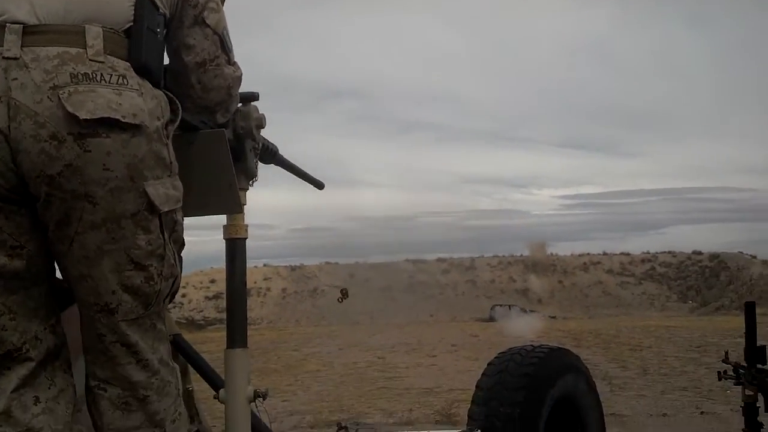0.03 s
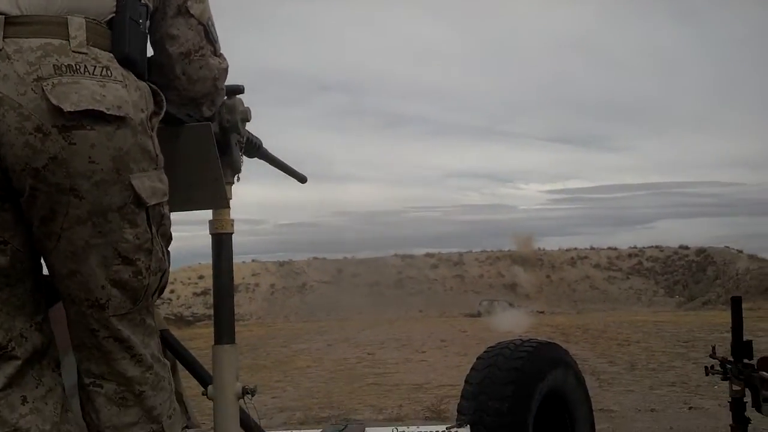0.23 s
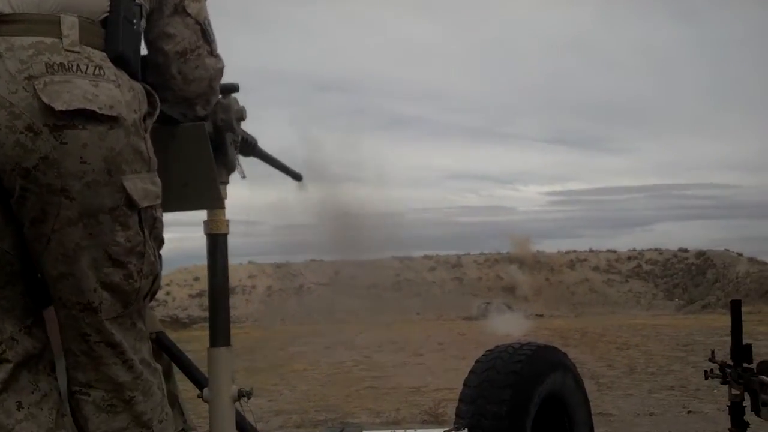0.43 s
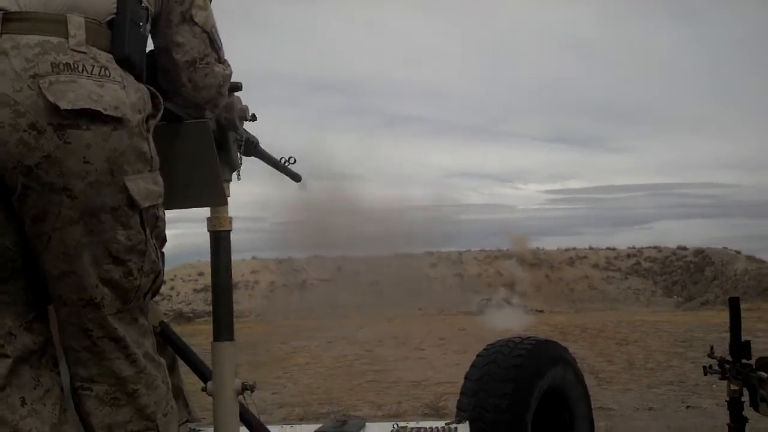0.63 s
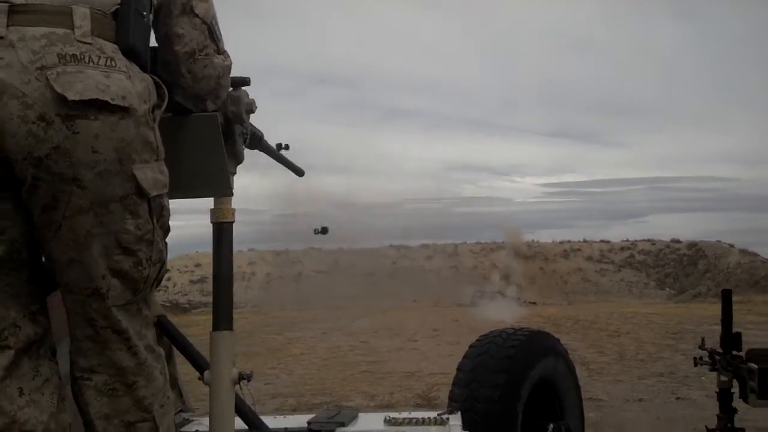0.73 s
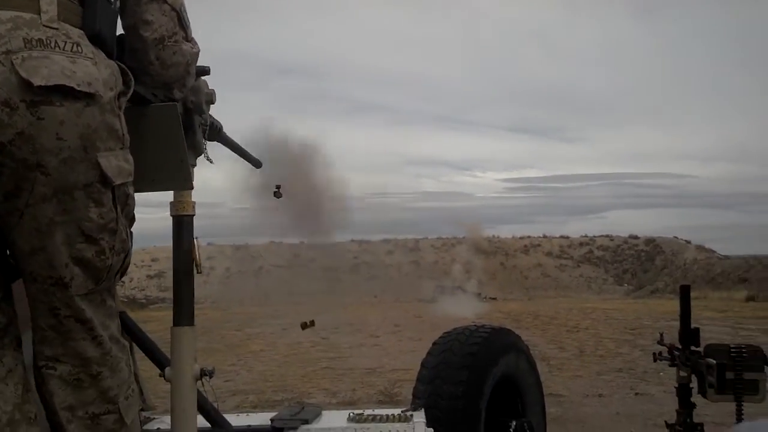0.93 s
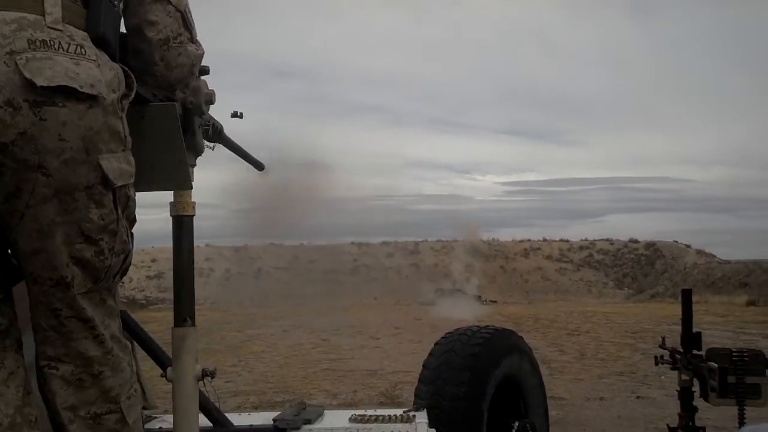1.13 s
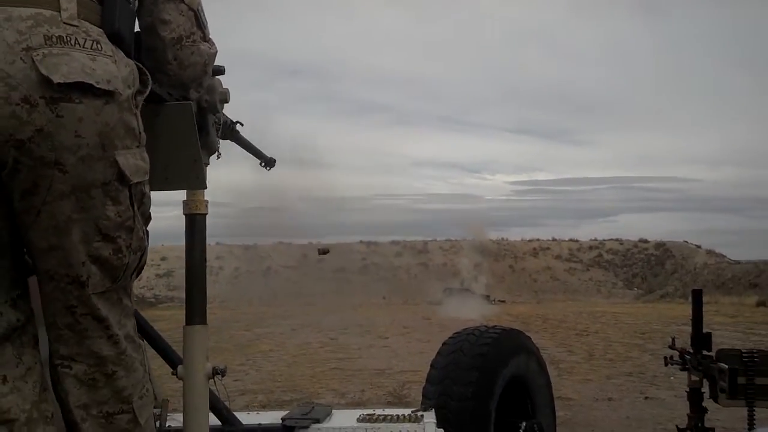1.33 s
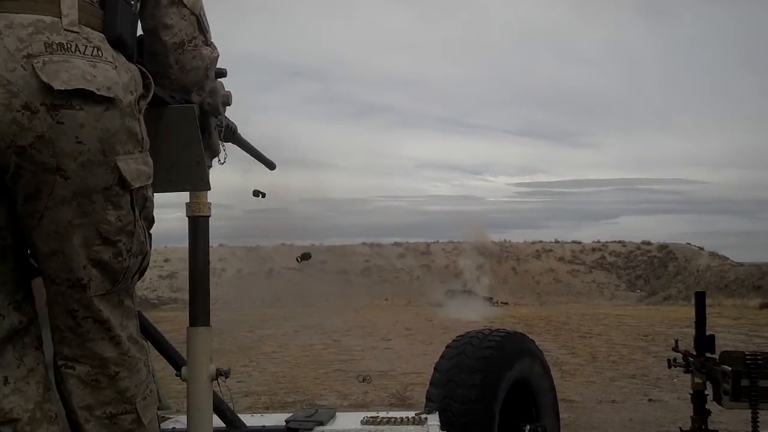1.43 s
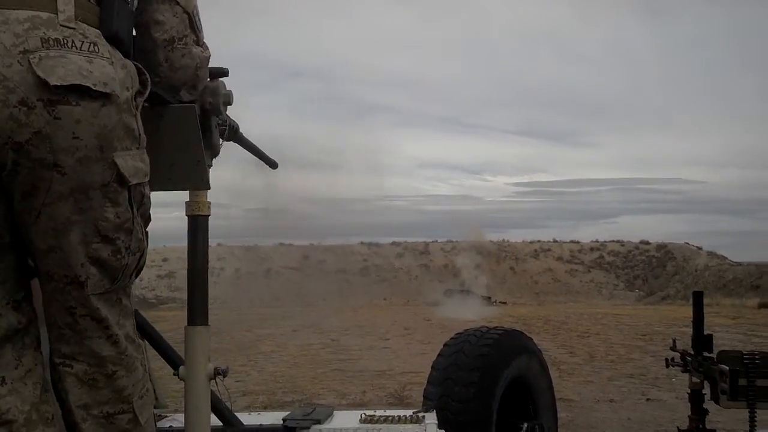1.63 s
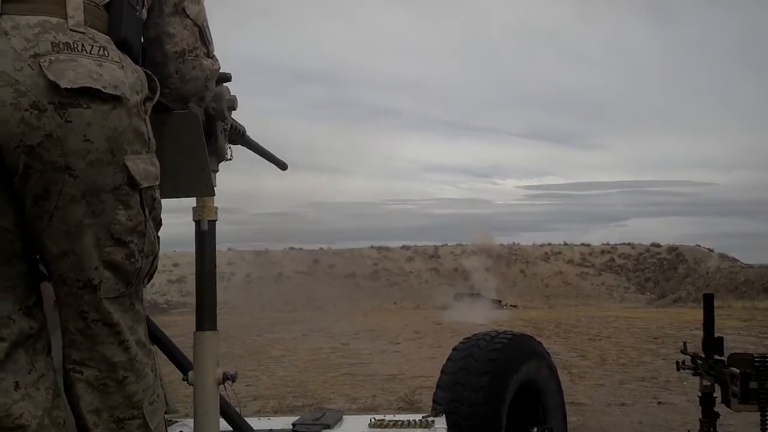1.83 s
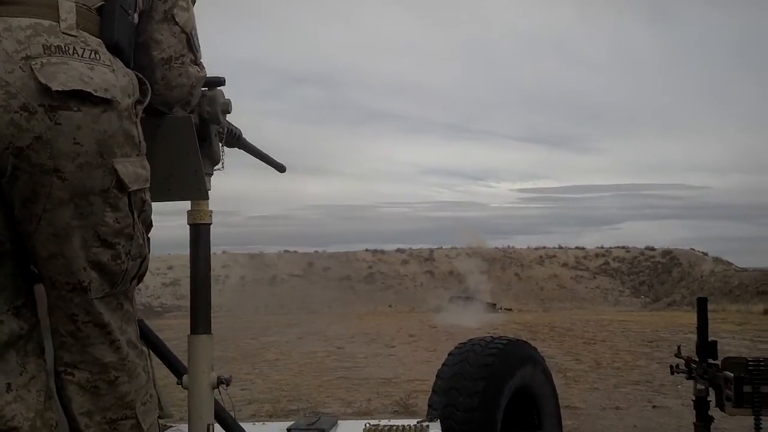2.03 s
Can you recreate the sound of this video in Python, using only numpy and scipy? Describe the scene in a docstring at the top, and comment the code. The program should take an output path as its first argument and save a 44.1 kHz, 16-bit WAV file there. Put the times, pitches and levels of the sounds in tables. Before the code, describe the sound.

Loud heavy machine gun bursts up close outdoors, with metal links clinking and echoes rolling away

```python
"""Open range, light wind, close to a vehicle: its mounted heavy machine gun fires three rounds, two, then one.
Each report is coloured noise that cracks and swells into a boom, with notes that ring the vehicle inside it.
Slow noise swells roll away over the ground, the first from a shot before the start.
Cases and gun parts knock, and wind or the rocking vehicle thumps low twice, as short noise with a note.
Belt links clink as resonant noise; a close camera with two microphone ports hears it in widened stereo."""
import sys
import numpy as np
from scipy.fft import rfft, irfft, next_fast_len
from scipy.io import wavfile
from scipy.ndimage import map_coordinates

SR = 44100
rng = np.random.default_rng(int(sys.argv[2]) if len(sys.argv) > 2 else 0)


def dump_mix(stems):
    """Bounce the given channels to the path in sys.argv[1] as a 16-bit WAV at rate SR."""
    frames = np.atleast_2d(stems).T  # one column per channel
    limited = np.clip(frames, -1, 1)  # hard clip at full scale
    pcm = np.round(limited * 32767).astype(np.int16)
    wavfile.write(sys.argv[1], SR, pcm)


N = 92610  # samples, 2.1 s


def amp(db):
    """Decibels to gain."""
    return 10 ** (np.asarray(db) / 20)


def rms(x):
    """Root mean square over everything in x."""
    return np.sqrt(np.mean(x ** 2) + 1e-20)


def unit(x):
    """Scaled to rms 1."""
    return x / rms(x)


def along(points, hz):
    """Values read between (Hz, value) points on a log frequency axis."""
    point_hz, values = np.transpose(points)
    return np.interp(np.log(hz + 1), np.log(point_hz + 1), values)


def colour(points):
    """Gain against frequency from (Hz, dB) points."""
    return lambda hz: amp(along(points, hz))


def resonances(modes):
    """Gain against frequency of peaks given as (Hz, width in Hz, dB), their powers added."""
    def response(hz):
        power = 0
        for centre, width, db in modes:
            power = power + amp(db) ** 2 / (1 + ((hz - centre) / width) ** 2) ** 2
        return np.sqrt(power)
    return response


def filtered(x, response):
    """x with its spectrum multiplied by a response of frequency."""
    size = next_fast_len(x.shape[-1] + 4096)
    spectrum = rfft(x, size) * response(np.fft.rfftfreq(size, 1 / SR))
    return irfft(spectrum, size)[..., :x.shape[-1]]


# Likeness of the two microphone ports. Each row: frequency in Hz, correlation from -1 to 1.
PORT_LIKENESS = [(40, .4), (130, 0.92), (300, 0.93), (480, 0.77), (900, 0.35), (1600, -0.11),
                 (4000, -0.013), (15000, -0.062)]


def noise(response, size):
    """Coloured noise of rms 1 at the two ports; the mid and side shares set how alike they are."""
    def mid_and_side(hz):
        turn = np.arccos(np.clip(along(PORT_LIKENESS, hz), -.99, .99)) / 2
        return response(hz) * np.array([np.cos(turn), np.sin(turn)])
    mid, side = filtered(rng.standard_normal((2, size)), mid_and_side)
    return unit(np.array([mid + side, mid - side]))


def fade(t, attack, t60, hold=0):
    """Attack, with an exponential release that starts after the hold."""
    return (1 - np.exp(-(t / attack) ** 2)) * amp(-60 * np.maximum(t - hold, 0) / t60)


def swell(t, peak, sharp):
    """A rounded rise to 1 at the peak time and a slower fall."""
    return (t / peak * np.exp(1 - t / peak)) ** sharp


WAVER_RAD, WAVER_RATE = 0.52, 125  # usual depth of the unsteady phase, random points a second
PORT_RAD = 0.37  # phase shift at each port, in opposite directions


def note(t, hz, fall=0, waver=WAVER_RAD):
    """A slightly unsteady tone of rms 1 at the two ports, its pitch falling by fall Hz a second."""
    drift = map_coordinates(rng.standard_normal(512), [t * WAVER_RATE], mode="wrap")
    phase = 2 * np.pi * (hz * t - fall * t ** 2 / 2 + rng.random()) + waver * drift
    port_shift = PORT_RAD * rng.choice([-1, 1]) * np.array([[1], [-1]])
    return np.sqrt(2) * np.sin(phase + port_shift)


def add(out, s, sound):
    """Mix a sound in at s seconds, cut at both ends of the scene."""
    i = round(s * SR)
    part = sound[:, max(-i, 0):N - i]
    out[:, max(i, 0):][:, :part.shape[1]] += part


# Light wind on the range. Each row: frequency in Hz, relative level in dB.
WIND_COLOUR = [(25, -17), (70, -16), (130, 6.5), (300, 1), (700, -8), (1600, -8), (3500, -28.5),
               (6500, -15), (10000, -38.5), (15500, -20)]
WIND_DB = -41.5


def wind():
    """Light wind as a steady floor of coloured noise."""
    return amp(WIND_DB) * noise(colour(WIND_COLOUR), size=N)


# The rounds fired. Each row: start in seconds, level of the crack in dB, level of the boom in dB.
SHOTS = [(0.4315, -18, -17), (0.5443, -19, -17.5), (.6421, -19, -17), (0.9936, -18, -17.5),
         (1.1115, -19.5, -17.5), (1.5454, -17, -17.5)]
# Echo off ground and far bank. Each row: frequency in Hz, relative level in dB.
ECHO_COLOUR = [(30, -25), (70, -11), (130, 11), (450, 1.5), (900, -6.5), (1800, -10.5), (3500, -17.5),
               (7000, -40), (15000, -59)]
EARLIER_SHOT_S, EARLIER_DB = -.3, -20.5  # only its echo is left
ECHO_DB, ECHO_RISE_S, ECHO_T60_S = -4, 0.074, 0.96  # level against the boom


def echoes():
    """Each report rolls back from the ground and the far bank as a slow, fading swell of noise."""
    out, t = np.zeros((2, N)), np.arange(SR) / SR
    envelope = fade(t, ECHO_RISE_S, ECHO_T60_S, hold=ECHO_RISE_S)
    returns = [(EARLIER_SHOT_S, EARLIER_DB)]
    returns += [(s, boom_db + ECHO_DB) for s, _, boom_db in SHOTS]
    for s, db in returns:
        add(out, s, amp(db) * envelope * noise(colour(ECHO_COLOUR), size=len(t)))
    return out


# Belt links dropping. Each row: start in seconds, level in dB, 60 dB decay time in seconds,
# scrape in dB against the jingle.
CLINKS = [(.033, -38.5, 0.28, 1), (.069, -30.5, 0.11, -2.5), (0.1762, -35.5, .12, 7), (0.219, -37, 0.36, 1),
          (.251, -38.5, 0.29, -8), (0.272, -35, 0.43, -3), (.745, -37, 0.18, -11), (0.8292, -29, 0.016, 14),
          (1.205, -31, 0.39, -10), (1.249, -34, 0.33, -24), (1.322, -35, 0.31, -3), (1.480, -39, 0.27, -5),
          (1.732, -31.5, 0.45, -7), (1.85, -39.5, 0.97, -5), (1.975, -43, 0.66, -2)]
# Modes of a steel link. Each row: frequency in Hz, width in Hz, relative level in dB.
LINK_MODES = [(4930, 62, -5), (6320, 78, 4.5), (6520, 160, -3), (7144, 70, -1.5), (10020, 106, -8.5),
              (12300, 160, -7), (14000, 150, -2.5), (14840, 340, -6)]
# Link scraping on metal. Each row: frequency in Hz, relative level in dB.
SCRAPE_COLOUR = [(1000, -30), (3000, 9), (6500, 0.5), (9000, 2), (15500, 2.5)]
# One singing case: start in seconds, pitch in Hz, level in dB, 60 dB decay time in seconds.
SINGING_CASE = (1.1, 7144.5, -47.5, 2.2)
CLINK_ATTACK_S, SINGING_RISE_S = 0.00081, 0.016


def links():
    """Steel links scrape and jingle in their modes as they drop; one case sings for half a second."""
    out, t = np.zeros((2, N)), np.arange(SR // 2) / SR
    for s, db, t60, scrape_db in CLINKS:
        jingle = noise(resonances(LINK_MODES), size=len(t))
        scrape = amp(scrape_db) * noise(colour(SCRAPE_COLOUR), size=len(t))
        add(out, s, amp(db) * fade(t, CLINK_ATTACK_S, t60) * unit(jingle + scrape))
    s, hz, db, t60 = SINGING_CASE
    add(out, s, amp(db) * fade(t, SINGING_RISE_S, t60) * note(t, hz))
    return out


# Cases and gun parts knocking, and two soft low thumps of wind or the rocking vehicle (at 0.121
# and 2.018 s). Each row: start in seconds, level in dB, 60 dB decay time in seconds,
# pitch in Hz, note in dB against that level, treble tilt of the noise in dB.
KNOCKS_AND_THUMPS = [(.036, -25.5, 0.14, 592, 3.5, -10.5), (0.121, -50.5, 0.13, 120, 23, -14),
                     (.203, -23.5, 0.16, 443, -0.5, -6.5), (.251, -28.5, 0.1, 1435, -5, -3),
                     (0.263, -28, 0.19, 1183, -9.5, -14), (0.376, -26, 0.12, 1272, -8, 0.5),
                     (.829, -14.5, 0.064, 487, -6, -4), (.900, -25.5, .09, 591, 0.5, -3),
                     (.927, -16.5, 0.13, 548, -3, -13.5), (.951, -18, .12, 596, -0.5, -10),
                     (1.208, -19.5, 0.079, 476, -6, -1), (1.278, -12.5, 0.045, 450, -2.5, -13),
                     (1.396, -14.5, 0.031, 194, 7, -15), (1.479, -31, .15, 3530, -14, 2.5),
                     (1.829, -16.5, 0.031, 640, -3.5, -13), (1.858, -26.5, 0.042, 970, -6, -3),
                     (1.873, -22.5, 0.14, 1333, -12.5, -4), (1.915, -29.5, 0.079, 1806, -1, 0.5),
                     (1.962, -32, 0.19, 1264, -7.5, -3), (2.008, -31.5, 0.17, 2016, -13, -4.5),
                     (2.018, -48, .14, 109, 19.5, -10), (2.068, -34, 0.15, 616, -3.5, -6.5)]
# Short noise before its tilt. Each row: frequency in Hz, relative level in dB.
KNOCK_COLOUR = [(40, -25), (120, -4), (300, -0.5), (600, -5), (1400, -6), (2200, -5), (4000, -14.5),
                (7000, -15.5), (10000, -29), (15500, -28)]
KNOCK_ATTACK_S, KNOCK_WAVER_RAD = 0.00049, 0.85
TREBLE_FROM_HZ, TREBLE_FULL_HZ = 1210, 4030  # the tilt begins, and is complete


def knocks_and_thumps():
    """Short noise and a note: cases and gun parts knock; wind or the rocking vehicle thumps, mostly note."""
    out, t = np.zeros((2, N)), np.arange(SR // 4) / SR
    for s, db, t60, pitch, note_db, treble_db in KNOCKS_AND_THUMPS:
        tilt = [(TREBLE_FROM_HZ, 0), (TREBLE_FULL_HZ, treble_db)]
        tilted = lambda hz: amp(along(KNOCK_COLOUR, hz) + along(tilt, hz))
        envelope = fade(t, KNOCK_ATTACK_S, t60)
        short_noise = rms(envelope) * unit(envelope * noise(tilted, size=len(t)))
        fading_note = amp(note_db) * envelope * note(t, pitch, waver=KNOCK_WAVER_RAD)
        add(out, s, amp(db) * (short_noise + fading_note))
    return out


GRAIN_DB, GRAIN_RATE = 2, 900  # depth, lumps a second


def crackle(t):
    """A fast, lumpy random gain inside the blast."""
    return amp(GRAIN_DB * map_coordinates(rng.standard_normal(2048), [t * GRAIN_RATE], mode="wrap"))


# Colours of snap and crack, bark, boom and air push. Each row: frequency in Hz, relative level in dB.
CRACK_COLOUR = [(60, -18), (200, 9.5), (700, -0.5), (2000, 0.5), (4000, -1), (6500, -3), (9000, -8.5),
                (12000, -9.5), (15500, -5)]
BARK_COLOUR = [(150, -4), (500, 3), (1200, 0.5), (2000, 1.5), (3000, -4.5), (5000, -6.5), (7000, -14.5),
               (10000, -49), (15000, -30)]
BOOM_COLOUR = [(30, -22), (80, -11.5), (130, -6.5), (200, -6), (300, -3), (480, -8), (800, -7.5),
               (1200, -19), (2200, -42), (5000, -55)]
PUSH_COLOUR = [(20, -11), (45, -6), (100, 8), (170, -16), (400, -26), (1500, -70)]
SAME_SHARE = 0.77  # power share of each report that repeats from shot to shot
LEAD_S, LEAD_DB, LEAD_T60_S = .0045, -5.5, 0.059  # snap: time before the blast, level against the crack
CRACK_ATTACK_S, CRACK_HOLD_S, CRACK_T60_S = 0.00064, 0.0076, 0.46
BARK_DB, BARK_PEAK_S, BARK_SHARP = -2, 0.025, 0.67  # level against the boom
BOOM_PEAK_S, BOOM_SHARP = 0.045, 1.84
PUSH_DB, PUSH_PEAK_S, PUSH_SHARP = -11, 0.0064, 1  # level against the boom


def gun():
    """The action snaps, then crack, bark, boom and a low push of air, much alike in every shot."""
    out, t = np.zeros((2, N)), np.arange(SR // 2) / SR
    times, crack_db, boom_db = np.transpose(SHOTS)
    snap = fade(t, CRACK_ATTACK_S, LEAD_T60_S)
    crack = crackle(t) * fade(t, CRACK_ATTACK_S, CRACK_T60_S, CRACK_HOLD_S)
    bark = crackle(t) * swell(t, BARK_PEAK_S, BARK_SHARP)
    boom = swell(t, BOOM_PEAK_S, BOOM_SHARP)
    push = swell(t, PUSH_PEAK_S, PUSH_SHARP)
    layers = [(CRACK_COLOUR, snap, crack_db + LEAD_DB, LEAD_S),
              (CRACK_COLOUR, crack, crack_db, 0),
              (BARK_COLOUR, bark, boom_db + BARK_DB, 0),
              (BOOM_COLOUR, boom, boom_db, 0),
              (PUSH_COLOUR, push, boom_db + PUSH_DB, 0)]
    for points, envelope, levels, early in layers:
        same = noise(colour(points), size=len(t))
        for s, db in zip(times, levels):
            fresh = noise(colour(points), size=len(t))
            blast = envelope * (np.sqrt(SAME_SHARE) * same + np.sqrt(1 - SAME_SHARE) * fresh)
            add(out, s - early, amp(db) * rms(envelope) * unit(blast))
    return out


# Notes of mount and vehicle. Each row: pitch at the peak in Hz, relative level in dB,
# peak time in seconds, sharpness of the swell, fall in Hz per second.
PANELS = [(195.5, -7, 0.045, 2.5, 0), (371.7, 0.5, 0.051, 14.7, 3), (481, 3, 0.0369, 3.9, 795),
          (445.7, -2.5, .07, 19.5, 1486), (550, -11.5, 0.039, 3.4, -10), (765, -4.5, 0.0521, 10.6, 900),
          (850, -13, 0.0499, 1.44, 691), (1220, -15, 0.029, 5.9, 0), (1454, -16, 0.033, 2.5, -3)]
RING_DB, RING_SCATTER_DB = -1.5, 0.5  # all notes against the boom, random spread from shot to shot


def ring():
    """The same notes swell and sag inside every boom, as the blast shakes mount and vehicle."""
    out, t = np.zeros((2, N)), np.arange(SR // 2) / SR
    for hz, db, peak, sharp, fall in PANELS:
        tone = swell(t, peak, sharp) * note(t, hz + fall * peak, fall)
        for s, _, boom_db in SHOTS:
            scatter_db = RING_SCATTER_DB * rng.standard_normal()
            add(out, s, amp(boom_db + RING_DB + db + scatter_db) * tone)
    return out


# Balance of the ports before widening. Each row: frequency in Hz, left minus right in dB.
BALANCE_DB = [(100, -2.2), (280, -3.6), (550, -1.3), (1200, -.4), (5000, 0.55)]


def scene():
    """Gun, echoes, knocks, thumps and links over light wind on the range, balanced between the two ports."""
    total = wind() + echoes() + links() + knocks_and_thumps() + gun() + ring()
    return filtered(total, lambda hz: amp(np.outer([1, -1], along(BALANCE_DB, hz)) / 2))


CROSSFEED, CROSSFEED_S = .995, 16 / 44100  # gain and delay of the opposite port
TOP_HZ = 15800


def record(dry):
    """The close camera takes a delayed copy of each port from the other, clips and limits the band."""
    delayed = filtered(dry[::-1], lambda hz: np.exp(-2j * np.pi * hz * CROSSFEED_S))
    wide = dry - CROSSFEED * delayed
    return filtered(np.clip(wide, -1, 1), lambda hz: hz < TOP_HZ)


dry = scene()
out = record(dry)
dump_mix(out)
```